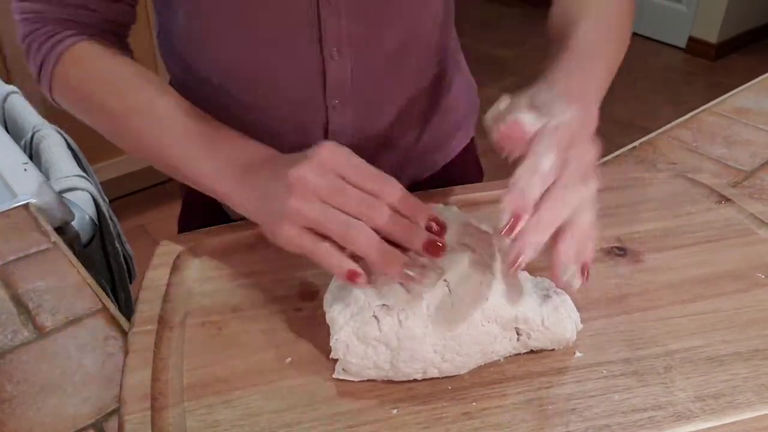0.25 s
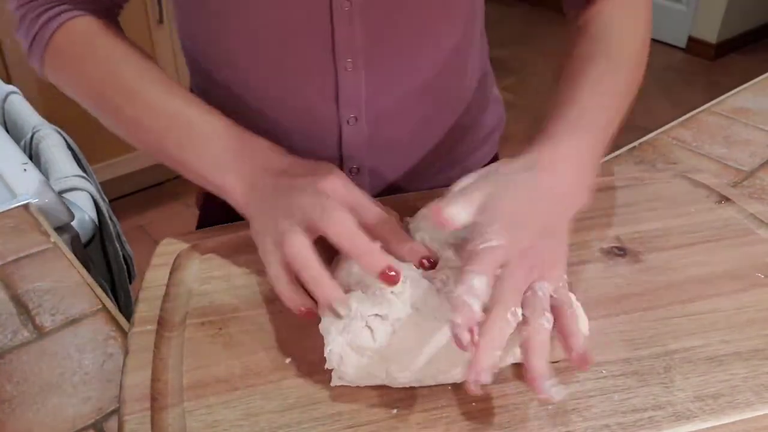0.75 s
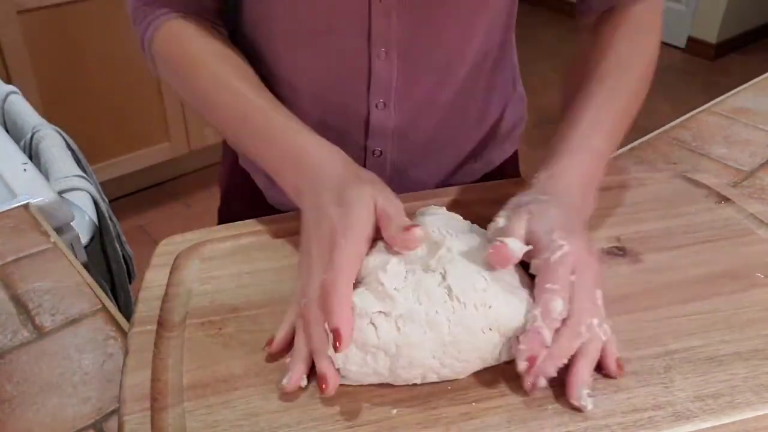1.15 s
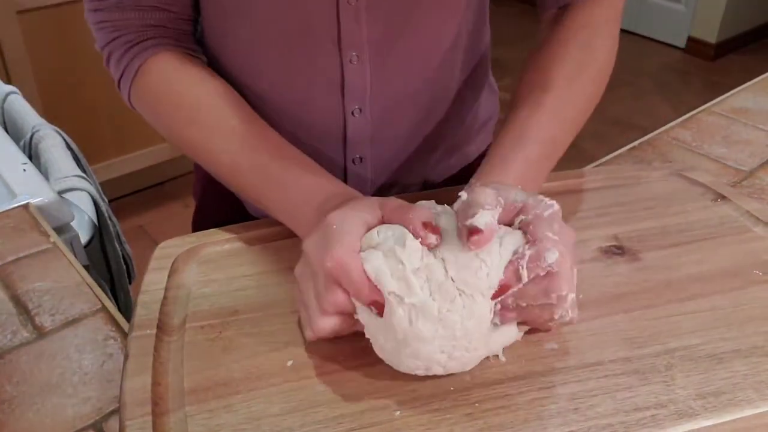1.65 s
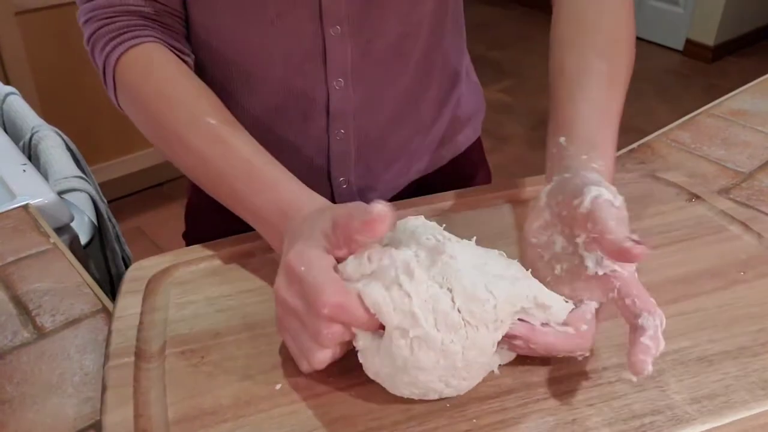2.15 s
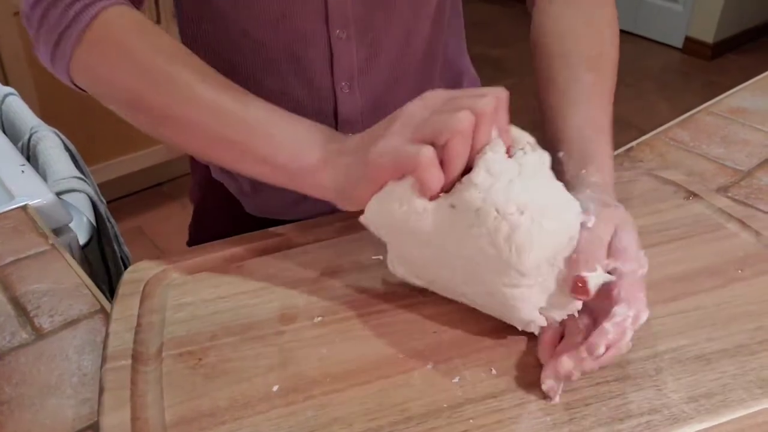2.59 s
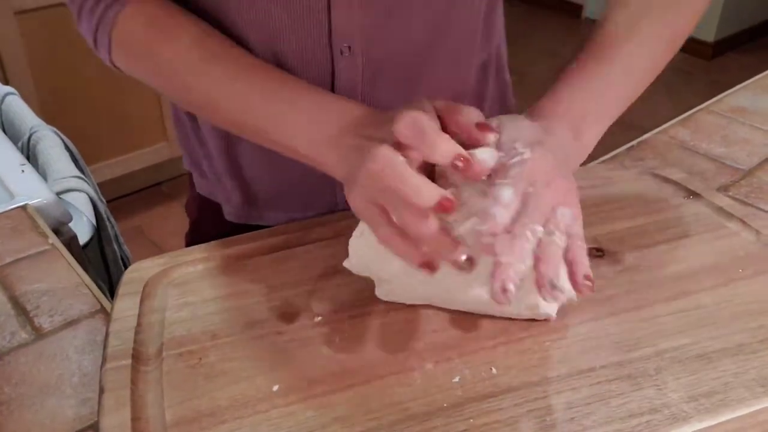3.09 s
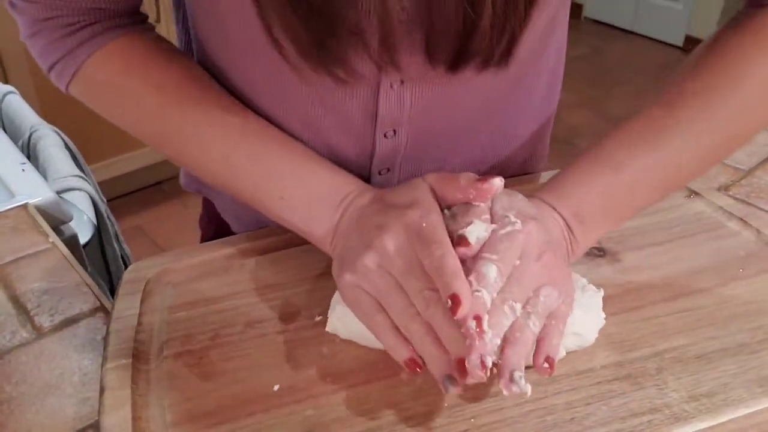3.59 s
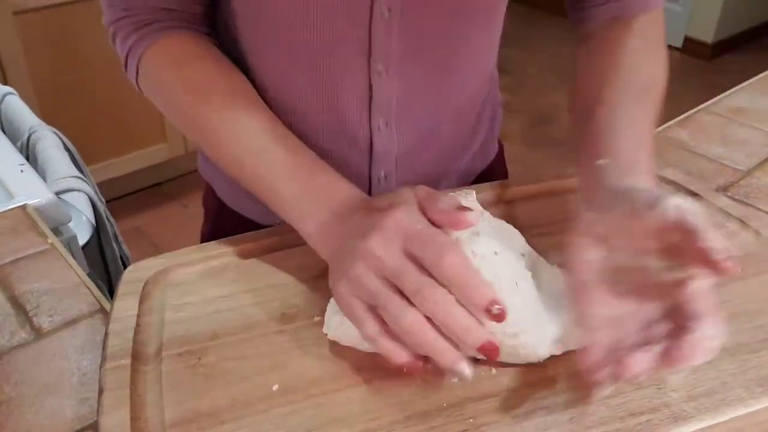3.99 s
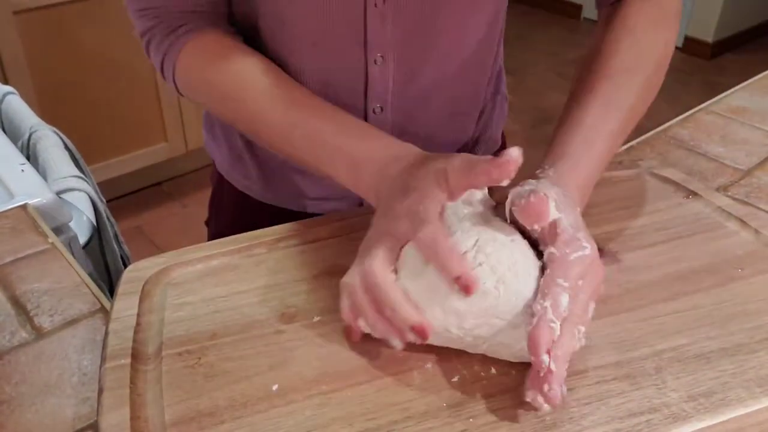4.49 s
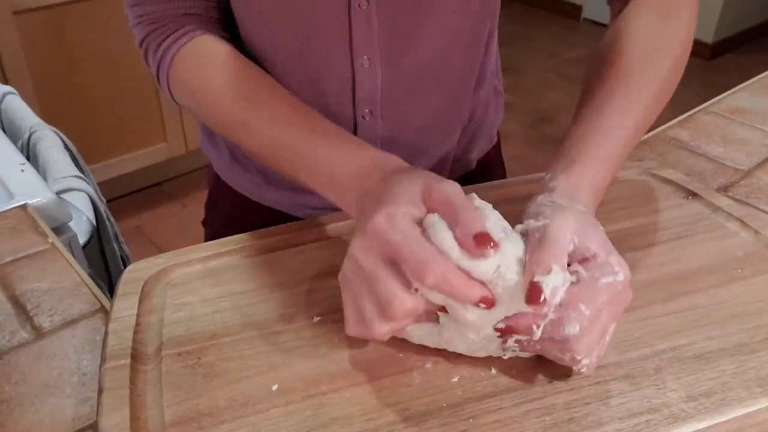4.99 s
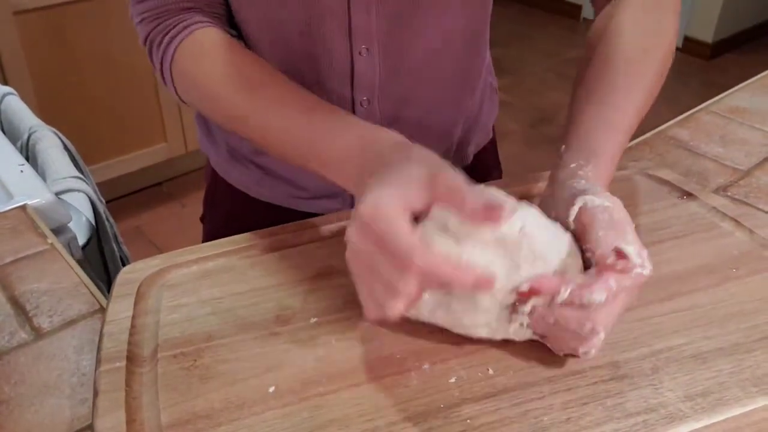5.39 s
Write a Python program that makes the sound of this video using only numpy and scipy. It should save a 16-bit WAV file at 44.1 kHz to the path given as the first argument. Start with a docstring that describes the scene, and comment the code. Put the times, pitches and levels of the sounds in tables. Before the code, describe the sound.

A deep thump through a wooden counter, then hands kneading dough with dry floury hisses, soft pats, low thumps and sharp board knocks.

```python
"""A deep thump through the counter comes first, then bare hands knead dough on a floured board.
In a small kitchen, palms and dough hiss over the wood as filtered noise, with soft pats on the lump.
Pushes rumble and thump as low noise and short swings; quick thumps leave something nearby humming.
The board knocks on the counter, as rough damped modes and noise, when the lump is lifted or dropped.
The work sounds louder on the left, over a quiet, steady kitchen background."""
import sys
import numpy as np
from scipy import signal
from scipy.fft import rfft, irfft, next_fast_len
from scipy.io import wavfile
from scipy.ndimage import uniform_filter1d, map_coordinates

SR = 44100
rng = np.random.default_rng(int(sys.argv[2]) if len(sys.argv) > 2 else 0)


def digitize_waveform(pressure):
    """Quantize a signal to 16-bit integers and store it at the path in sys.argv[1].

    Rows of a 2-D input are taken as channels; values are limited to [-1, 1].
    """
    field = np.atleast_2d(pressure).T
    bounded = np.clip(field, -1, 1)
    quanta = np.round(bounded * 32767).astype(np.int16)
    wavfile.write(sys.argv[1], SR, quanta)


N = 249165

# Dough and palms slide over the board. Each row: start of full speed in seconds, rise in seconds,
# hold in seconds, fall in seconds, hiss in dB, then grit, flour and wood in dB relative to the hiss.
# Rise and fall span 20 dB; all levels are before the trims in sliding().
STROKES = [(0.816, 0.026, 0.071, .13, -58, -3.5, 5, 1), (1.151, .04, 0.015, .2, -74, 1, -11, 10.5),
           (1.347, 0.061, .03, 0.27, -59, -1, -3.5, 4.5), (1.543, 0.089, 0.15, .15, -64, 5.5, -1, 9),
           (1.754, 0.1, 0.055, 0.075, -33.5, -6, -4, -9.5), (2.01, .16, .04, 0.25, -58, 0.5, 0, 3.5),
           (2.103, 0.064, 0.015, 0.087, -50.5, 4.5, 0, 10), (2.245, 0.12, 0.017, 0.46, -65.5, -10, 10, 5.5),
           (2.37, 0.031, 0.021, .1, -48.5, -1.5, 4, 2), (2.429, 0.051, 0.015, 0.092, -42.5, -2.5, 4, 1.5),
           (2.678, 0.15, 0.11, 0.25, -69, -7, 8.5, -8.5), (3.083, 0.0071, .01, 0.038, -71.5, 13, 3, 12),
           (3.124, 0.076, 0.01, 0.21, -75.5, 15.5, 4, 19.5), (3.888, 0.052, 0.12, .1, -59.5, -16, 5, -6.5),
           (3.976, 0.042, 0.01, .06, -43, 0.5, -1.5, -1.5), (4.102, .1, 0.082, .1, -59.5, -4, 5, 6),
           (4.363, 0.056, 0.089, 0.15, -64.5, 5, -1, 9.5), (4.545, .15, 0.015, 0.22, -62, -30, 7, -2),
           (5.056, 0.082, .08, 0.45, -68.5, -6.5, 8.5, 1.5), (5.47, 0.096, 0.026, 0.47, -52.5, -9, 6, -3.5)]
# The faint rub of hands that never leave the dough: hiss in dB, the rest relative to it, before the trims.
TOUCH_DB, TOUCH_GRIT_DB, TOUCH_FLOUR_DB, TOUCH_WOOD_DB = -88, -0.5, 8, 8.5
# Light sliding. Each row: frequency in Hz, density in dB per Hz.
HISS_SPECTRUM = [(1500, -25), (3200, -13.5), (4200, -1.5), (5200, -0.5), (6500, 0.5), (7600, -8.5),
                 (9000, -10), (15000, -12.5)]
# Dough dragged hard. Each row: frequency in Hz, density in dB per Hz.
GRIT_SPECTRUM = [(700, -27), (1200, -4), (1500, 0.5), (1950, 3.5), (2450, 2), (3000, 0), (3500, -0.5),
                 (4000, -2), (4600, -7), (7000, -42)]
# Fine dry flour hiss. Each row: frequency in Hz, density in dB per Hz.
FLOUR_SPECTRUM = [(5000, -32.5), (8300, -6.5), (10500, 0.5), (14000, 2.5), (16000, 0.5)]
# Rubbed board. Each row: frequency in Hz, density in dB per Hz.
WOOD_SPECTRUM = [(130, -27.5), (250, -1), (480, -0.5), (700, -5.5), (1000, -11), (1500, -12), (2500, -22)]
# A sticky thread letting go. Each row: frequency in Hz, density in dB per Hz.
SNAP_SPECTRUM = [(600, -26.5), (1500, 3), (3000, -0.5), (6000, -10), (14000, -11)]
CRACKLE_PER_S, CRACKLE_DB, CRACKLE_SPREAD_DB = 350, -8.5, 1.5

# Palms and dough pat each other. Each row: start in seconds, level in dB, puff decay t60 in seconds,
# lightness as low cut in Hz.
PATS = [(0.435, -46.5, 0.21, 250), (0.803, -48, 0.14, 1220), (2.029, -46.5, 0.24, 4500),
        (2.262, -58.5, 0.038, 3000), (2.689, -57, 0.64, 2500), (2.782, -46, 0.085, 500),
        (3.241, -50, 0.13, 3500), (3.877, -60, 0.069, 1500), (4.349, -56, .08, 300),
        (5.137, -45.5, 0.32, 1500)]
# Skin on dough. Each row: frequency in Hz, density in dB per Hz.
SKIN_SPECTRUM = [(150, -5.5), (600, 9), (1100, -8.5), (2400, -1), (5000, -5.5), (8000, -6.5), (14000, -0.5)]

# The board hits the counter. Each row: start in seconds, level in dB, hardness as cut-off in Hz.
KNOCKS = [(1.136, -52, 704), (2.0211, -14.5, 2464), (2.031, -26, 1030), (2.662, -48.5, 1810),
          (2.6865, -26, 1096), (2.692, -15.5, 774), (2.715, -24.5, 600), (4.351, -39, 1100),
          (5.1405, -21, 2270), (5.157, -19.5, 2010), (5.199, -21.5, 254), (5.628, -21, 880)]
# Blow on the wood. Each row: frequency in Hz, density in dB per Hz.
CLACK_SPECTRUM = [(60, -2), (180, -3), (330, -9.5), (480, -1), (600, -14.5), (850, -5.5), (1080, -22.5),
                  (1450, -18.5), (1750, -10.5), (2300, -17.5), (3400, -20.5), (5000, -29), (9000, -45.5)]
# Modes of the board. Each row: frequency in Hz, level in dB.
BOARD_MODES = [(205, -4.5), (290, -8.5), (355, -8.5), (410, -6.5), (512, -2), (694, 2.5), (824, 0),
               (905, -6.5), (965, -3.5), (1200, -3.5), (1595, -6), (1715, -0.5), (2020, -11), (2290, -18),
               (2590, -14), (3080, -23.5)]

# Pushes and drops shake the counter; a quicker push swings it at a higher pitch.
# Each row: crest in seconds, level in dB, pitch in Hz.
THUMPS = [(0.208, -11, 58.3), (0.263, -27, 63), (1.166, -27.5, 80.6), (1.672, -22.5, 52.2),
          (1.925, -26, 44), (2.04, -17.5, 83), (2.7, -17, 86.2), (2.723, -15, 92.3), (3.048, -29.5, 71),
          (3.375, -29, 68.3), (4.377, -21, 79.7), (5.159, -23.5, 82), (5.208, -17.5, 79.8),
          (5.641, -15, 98)]
# The rise holds at PUSH_HZ and shortens as the pitch goes up.
PUSH_HZ, PUSH_RISE_S, RISE_POWER, SWING_T60_S = 52.7, 0.034, 2.08, 0.19

# Something hollow on the counter. Each row: frequency in Hz, level in dB relative to a thump
# at HUM_FULL_HZ, decay t60 in seconds.
HUM_MODES = [(223.6, -29.5, 1.98), (267, -45, 0.26), (375, -36, 1.7)]
HUM_FULL_HZ, HUM_DB_PER_OCTAVE = 97, 37

# Spells of kneading; the counter rumble eases between them while lighter rubbing goes on.
# Each row: start in seconds, end in seconds, rumble in dB before the trim in rumble().
BOUTS = [(.17, 0.478, -38), (0.842, 1.08, -36), (1.33, 2.46, -40), (2.784, 3.474, -39), (3.9, 4.155, -36),
         (4.878, 5.626, -40)]
# Rumble between spells before the same trim; times to swell and to ease by 20 dB.
EASED_DB, LEAN_IN_S, LEAN_OFF_S = -48, 0.13, 0.083
# Shuddering counter. Each row: frequency in Hz, density in dB per Hz.
COUNTER_SPECTRUM = [(20, -17.5), (30, -4.5), (44, 0.5), (60, 0.5), (82, 1), (100, -5.5), (128, -17.5),
                    (150, -22), (185, -30), (222, -17.5), (260, -42), (400, -69.5)]

# Kitchen background. Each row: frequency in Hz, density in dB per Hz.
QUIET_SPECTRUM = [(20, -33.5), (33, -16.5), (50, -7.5), (90, -10.5), (125, -9.5), (165, -49), (280, -22),
                  (360, -30), (700, -37), (950, -48.5), (2200, -52), (5700, -59.5), (15500, -65.5)]
# Answer of the kitchen walls. Each row: frequency in Hz, decay t60 in seconds.
WALL_DECAY = [(100, 0.58), (400, 0.33), (1500, 0.38), (5000, 0.27), (14000, 0.069)]
# Likeness of the two microphone ports. Each row: frequency in Hz, left-right correlation.
PORT_LIKENESS = [(100, 0.99), (280, 0.47), (650, 0.3), (1400, 0), (3000, 0.029), (15000, 0)]
# Microphone colour on the work. Each row: frequency in Hz, left minus right in dB.
PORT_COLOUR = [(100, 0.66), (500, 0.5), (1200, 4), (2500, 4), (5000, 8.5), (8300, 1), (13000, 0.5)]
TOP_HZ = 15750  # upper band limit of the microphone


def sliding():
    """Countless flour grains rub between dough and wood; each stroke has its own grit, flour and board."""
    contacts = [(np.full(N, amp(TOUCH_DB)), TOUCH_GRIT_DB, TOUCH_FLOUR_DB, TOUCH_WOOD_DB)]
    for s, rise, hold, fall, db, grit_db, flour_db, wood_db in STROKES:
        gain = amp(db) * swell(s, s + hold, rise, fall)
        contacts.append((gain, grit_db, flour_db, wood_db))
    # overlapping contacts add in power
    power = sum(np.outer(amp([0, *shares_db]), gain) ** 2 for gain, *shares_db in contacts)
    hiss_gain, grit_gain, flour_gain, wood_gain = np.sqrt(power)

    hiss = grainy(noise(HISS_SPECTRUM), depth_db=4.0)
    grit = grainy(noise(GRIT_SPECTRUM), depth_db=4.0) + amp(CRACKLE_DB) * crackle()
    flour = noise(FLOUR_SPECTRUM)
    plain_wood = amp(-4.0) * noise(WOOD_SPECTRUM)
    resonant_wood = unit(filtered(noise(WOOD_SPECTRUM), board_response))
    wood = plain_wood + resonant_wood

    grains = amp(1.0) * hiss_gain * hiss
    grains += amp(2.5) * grit_gain * grit
    grains += amp(4.5) * flour_gain * flour
    drag_db = 1.1 * wobble(60) + 0.54 * wobble(400)  # uneven drag
    return amp(drag_db) * (early_copies(grains, level_db=-14.0) + wood_gain * wood)


def crackle():
    """Sticky threads of dough let go in tiny snaps at random moments, a few of them larger."""
    size = amp(CRACKLE_SPREAD_DB * np.minimum(rng.exponential(size=N), 4))
    happens = rng.random(N) < CRACKLE_PER_S / SR
    snaps = happens * size * rng.standard_normal((2, N))
    return unit(filtered(snaps, lambda hz: amp(along(SNAP_SPECTRUM, hz))))


def board_response(hz):
    """Response of the board's damped modes, loaded by the dough that lies on them."""
    damping_hz = 25
    response = 0
    for k, (mode_hz, db) in enumerate(BOARD_MODES):
        drag = 1j * hz * damping_hz
        response = response + (-1) ** k * amp(db) * drag / (mode_hz ** 2 - hz ** 2 + drag)
    return response


def pats():
    """Skin meets floury dough with a sticky tick and a puff; a light touch has no body."""
    out, t = np.zeros((2, N)), np.arange(SR // 2) / SR
    for s, db, t60, cut_hz in PATS:
        tick = amp(2 - 60 * t / 0.012)
        puff = amp(-60 * t / t60) * (1 - np.exp(-t / 0.0013))
        low_cut = lambda hz: hz ** 2 / (hz ** 2 + cut_hz ** 2)
        skin = unit(filtered(noise(SKIN_SPECTRUM, size=len(t)), low_cut))
        add(out, s, with_walls(amp(db) * (tick + puff) * skin, wet_db=-3.0))
    return out


def knocks():
    """A crack, a brief clack and the board's damped modes, dulled by the dough's cushion."""
    out, t = np.zeros((2, N)), np.arange(SR // 2) / SR
    for s, db, cut_hz in KNOCKS:
        crack_and_clack = amp(1.0 - 60 * t / 0.011) + amp(-1 - 60 * t / 0.085)
        clack = noise(CLACK_SPECTRUM, size=len(t)) * crack_and_clack
        cushion = signal.butter(2, min(cut_hz, SR / 3), fs=SR)
        contact = 1 - np.exp(-t / 0.0005)
        blow = signal.lfilter(*cushion, contact * (clack + amp(-13.0) * board_ringing(t)))
        add(out, s, with_walls(amp(db) * blow, wet_db=-10.0))
    return out


def board_ringing(t):
    """A blow rings the board's modes; higher ones die sooner and differ more between the ports."""
    out = np.zeros((2, len(t)))
    for hz, db in BOARD_MODES:
        t60 = 0.14 * np.sqrt(600 / hz)
        phase = rng.uniform(0, 2 * np.pi) + rng.normal(0, hz / 1100, (2, 1))
        # random phase drift makes the ringing slightly rough
        drift = 0.0069 * np.cumsum(rng.standard_normal(len(t)))
        decay = amp(db + rng.normal(0, 3.0) - 60 * t / t60)
        out += decay * np.sin(2 * np.pi * hz * t + phase + drift)
    return out


def thumps():
    """The counter swings for a few cycles after each push, with a weaker upper mode."""
    out = np.zeros(N)
    for s, db, hz in THUMPS:
        t = np.arange(N) / SR - s
        rise = PUSH_RISE_S * (PUSH_HZ / hz) ** RISE_POWER
        onset = np.exp(-(np.minimum(t, 0) / rise) ** 2)
        swing = onset * amp(db - 60 * np.maximum(t, 0) / SWING_T60_S)
        upper_mode = amp(-9.5) * np.cos(2 * np.pi * 1.546 * hz * t)
        out += swing * (np.cos(2 * np.pi * hz * t) + upper_mode)
    # keep the thumps low and smooth
    return filtered(out, lambda hz: 1 / (1 + (hz / 210) ** 6))


def hum():
    """Thumps set something hollow on the counter ringing, far more so at a higher pitch."""
    out, t = np.zeros((1, N)), np.arange(2 * SR) / SR
    ring = sum(amp(db - 60 * t / t60) * np.sin(2 * np.pi * hz * t) for hz, db, t60 in HUM_MODES)
    for s, db, hz in THUMPS:
        reach_db = HUM_DB_PER_OCTAVE * np.log2(hz / HUM_FULL_HZ)
        add(out, s, amp(db + reach_db) * ring)
    return out


def rumble():
    """The counter shudders under the working arms and eases between spells."""
    power = amp(EASED_DB) ** 2
    for start, end, db in BOUTS:
        power = power + (amp(db) * swell(start, end, LEAN_IN_S, LEAN_OFF_S)) ** 2
    return amp(-0.5) * np.sqrt(power) * noise(COUNTER_SPECTRUM)


def kitchen_background():
    """Steady stereo noise, strongest in the bass, stands for the quiet kitchen."""
    return amp(-51.5) * noise(QUIET_SPECTRUM)


def with_walls(x, wet_db):
    """A short sound with the diffuse answer of the walls, whose highest treble dies first."""
    flat = [(20, 0.0069), (20000, 0.0013)]  # practically white
    hz, t, z = signal.stft(noise(flat, size=SR // 2), SR, nperseg=256)
    decay = amp(-60 * t / along(WALL_DECAY, hz)[:, None])
    build_up = 1 - np.exp(-t / 0.002)
    tail = signal.istft(z * decay * build_up, SR, nperseg=256)[1]
    tail = tail / np.linalg.norm(tail[0])
    return x + amp(wet_db) * signal.fftconvolve(x, tail, axes=1)[:, :x.shape[1]]


def early_copies(x, level_db, count=10):
    """Counter, arms and body return weak early copies, which ripple the colour differently at each port."""
    delays_s = rng.uniform(0.0004, 0.016, (2, count))
    copies = []
    for port, delays in zip(x, delays_s):
        copies.append(sum(rng.choice([-1, 1]) * np.roll(port, round(s * SR)) for s in delays))
    return (x + amp(level_db) * np.array(copies)) / np.sqrt(1 + count * amp(level_db) ** 2)


def grainy(x, depth_db):
    """Noise with an uneven, slightly grainy texture, from random gains over time and frequency."""
    z = signal.stft(x, nperseg=512)[2]
    field = uniform_filter1d(rng.standard_normal(z.shape), size=3, axis=1)
    field = uniform_filter1d(field, size=7, axis=2)
    return unit(signal.istft(z * amp(depth_db * unit(field)), nperseg=512)[1][:, :N])


def noise(spectrum, size=N):
    """Stereo noise of rms 1, alike in the bass and nearly unrelated in the treble."""
    def mid_side_gain(hz):
        turn = np.arccos(np.clip(along(PORT_LIKENESS, hz), -1, 1)) / 2
        return amp(along(spectrum, hz)) * [np.cos(turn), np.sin(turn)]
    mid, side = filtered(rng.standard_normal((2, size)), mid_side_gain)
    return unit(np.array([mid + side, mid - side]))


def swell(start, end, rise, fall):
    """Gain that climbs, holds from start to end and dies away; rise and fall are the times for 20 dB."""
    t = np.arange(N) / SR
    before, after = np.maximum(start - t, 0), np.maximum(t - end, 0)
    return amp(-20 * (before / rise + after / fall))


def wobble(rate):
    """A smooth random curve, rate knots a second."""
    knots = rng.standard_normal(int(N * rate / SR) + 4)
    return map_coordinates(knots, [np.arange(N) * rate / SR])


def filtered(x, response):
    """x times a response of frequency, padded against wrap-around."""
    n = x.shape[-1]
    m = next_fast_len(n + 8192)
    return irfft(rfft(x, m) * response(np.fft.rfftfreq(m, 1 / SR)), m)[..., :n]


def along(points, hz):
    """(Hz, value) points interpolated on a log frequency axis."""
    f, v = np.transpose(points)
    return np.interp(np.log(hz + 1), np.log(f + 1), v)


def add(track, s, sound):
    """Mix a sound into the track from s seconds."""
    part = track[:, max(round(s * SR), 0):][:, :sound.shape[-1]]
    part += sound[..., :part.shape[1]]


def amp(db):
    """Decibels to gain."""
    return 10 ** (np.asarray(db) / 20)


def unit(x):
    """x at rms 1."""
    return x / np.sqrt(np.mean(x ** 2) + 1e-20)


def scene():
    """The work, coloured unevenly by the two microphone ports, over the steady kitchen background."""
    work = sliding() + pats() + knocks() + thumps() + hum() + rumble()
    # half of the level difference goes to each port
    coloured = filtered(work, lambda hz: amp(np.outer([0.5, -0.5], along(PORT_COLOUR, hz))))
    return coloured + kitchen_background()


def record(dry):
    """The microphone keeps nothing above its band limit."""
    return filtered(dry, lambda hz: hz < TOP_HZ)


dry = scene()
out = record(dry)
digitize_waveform(out)
```